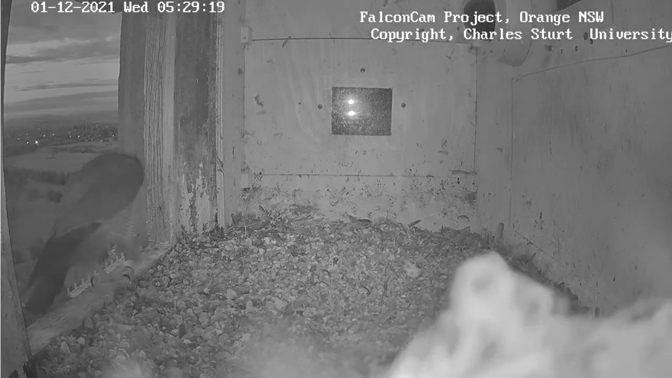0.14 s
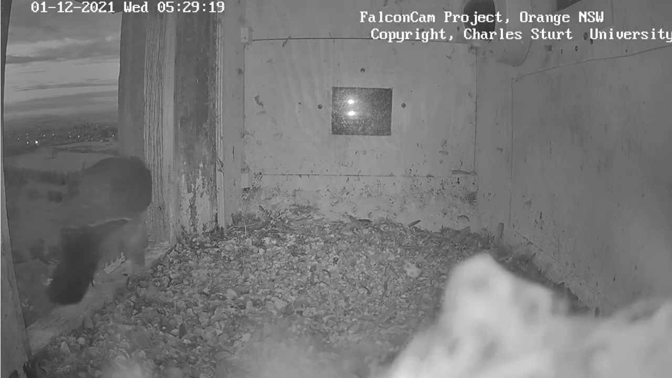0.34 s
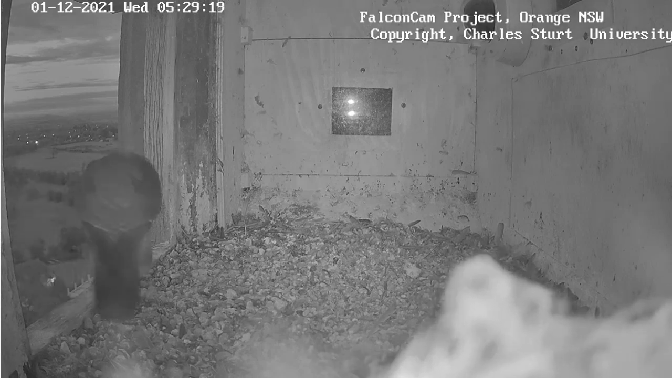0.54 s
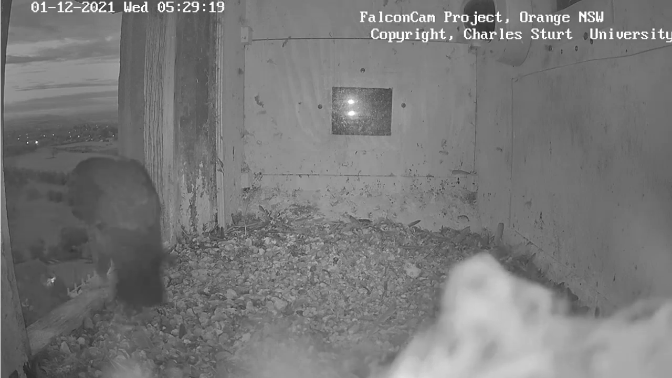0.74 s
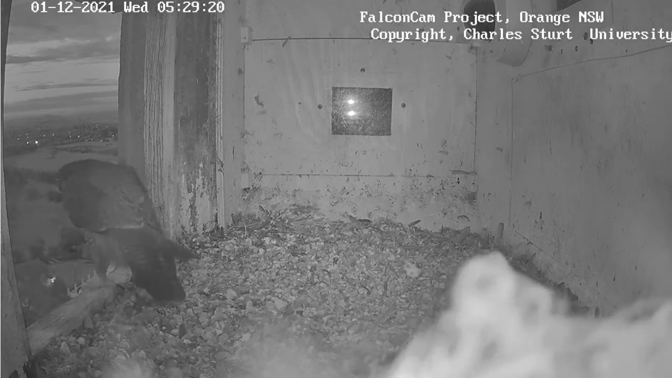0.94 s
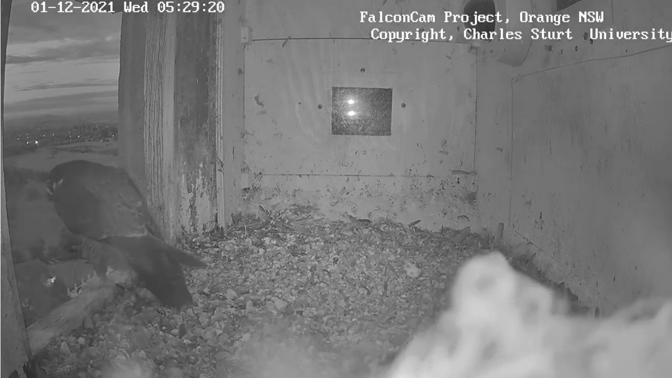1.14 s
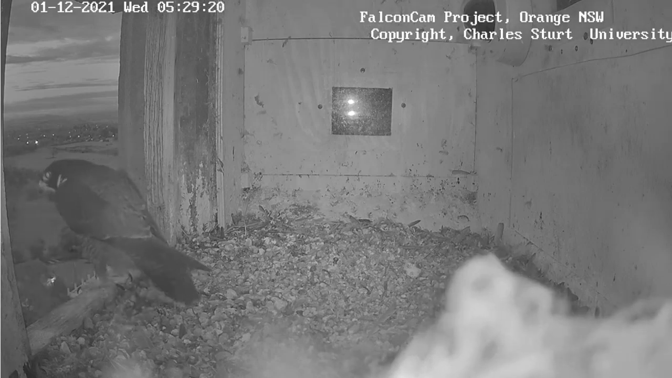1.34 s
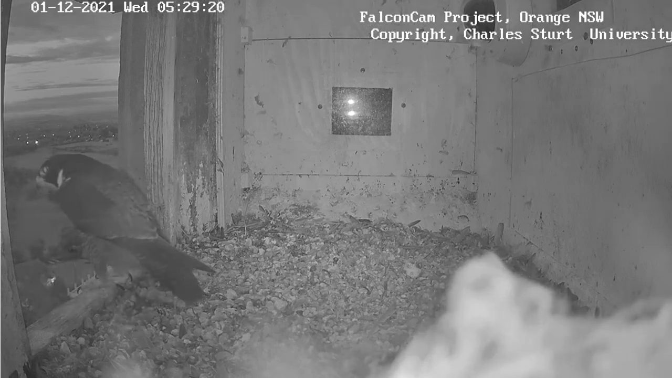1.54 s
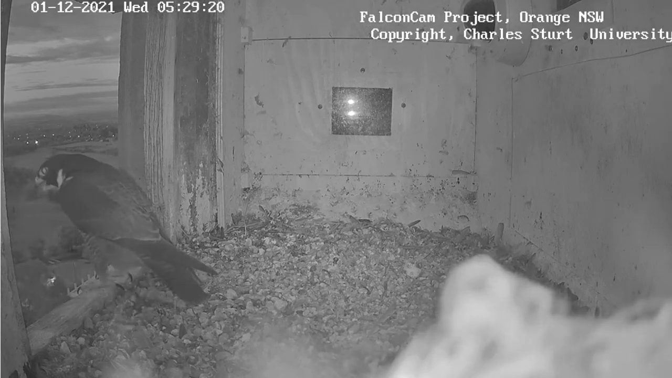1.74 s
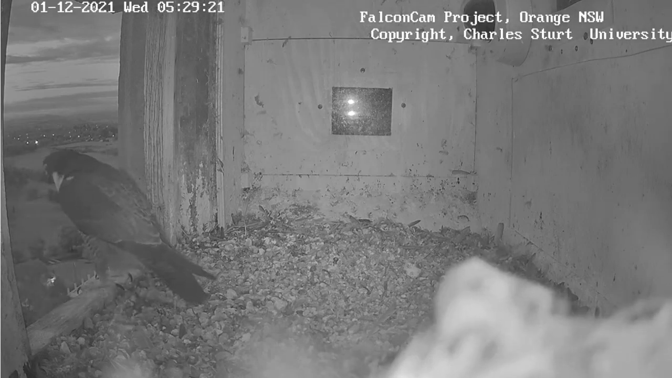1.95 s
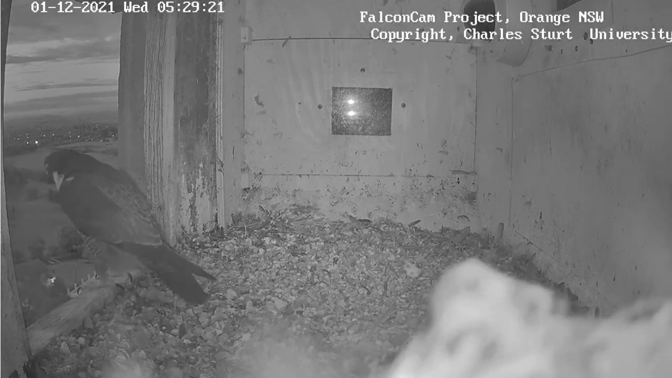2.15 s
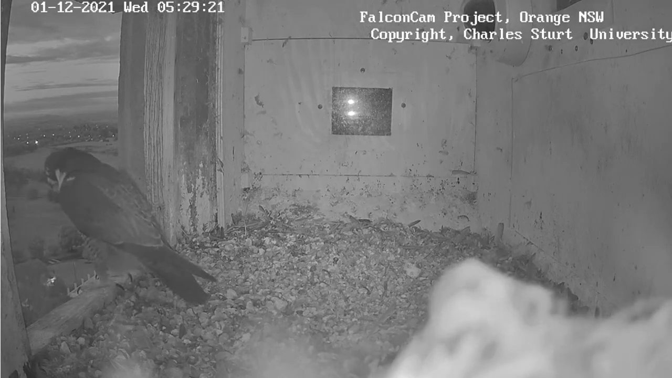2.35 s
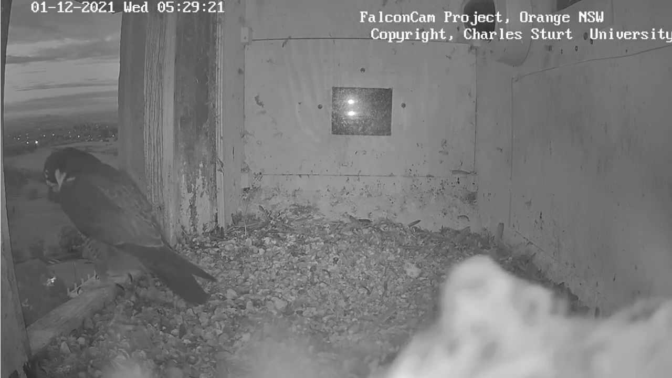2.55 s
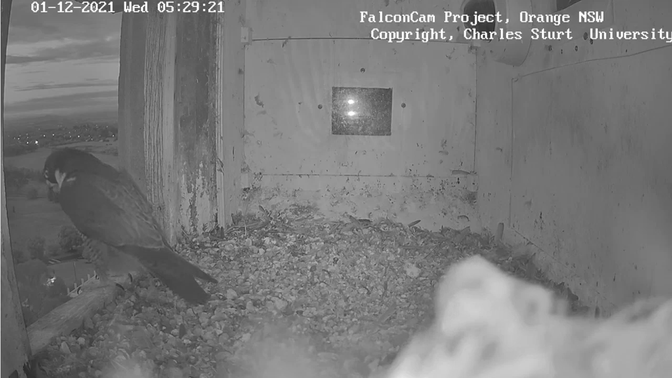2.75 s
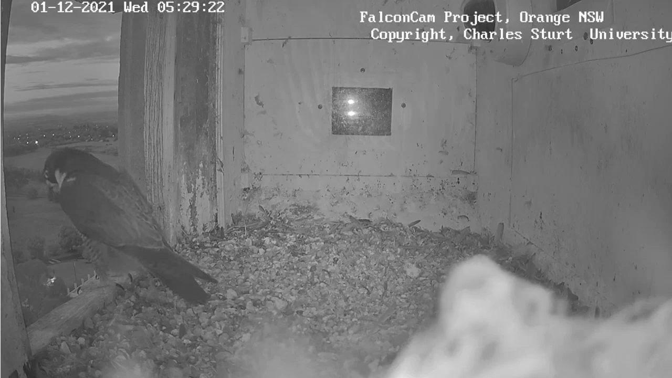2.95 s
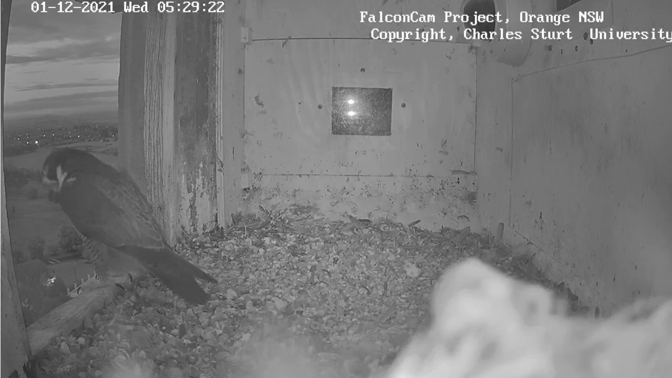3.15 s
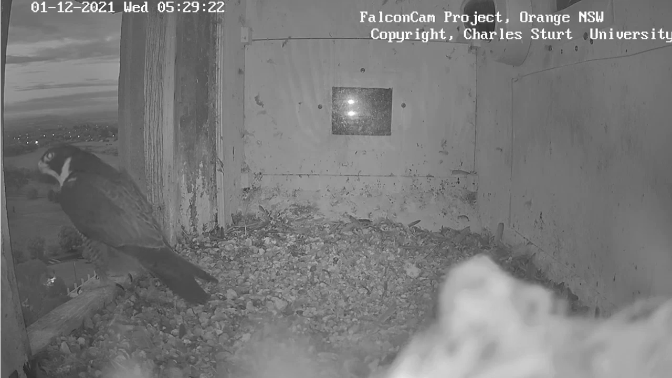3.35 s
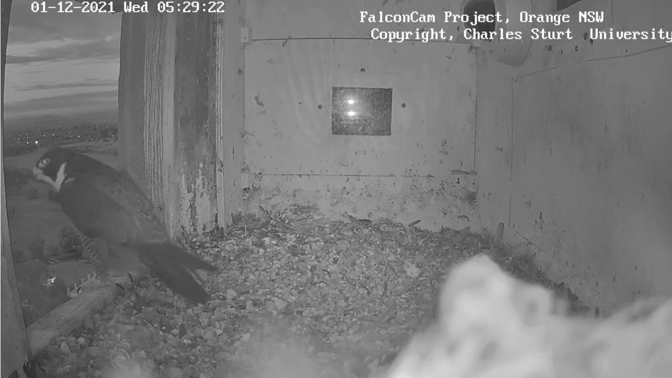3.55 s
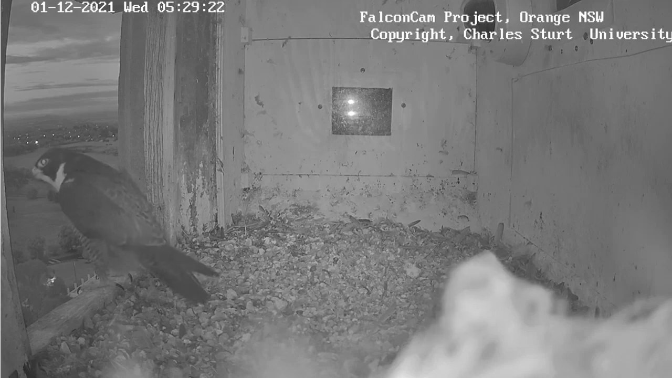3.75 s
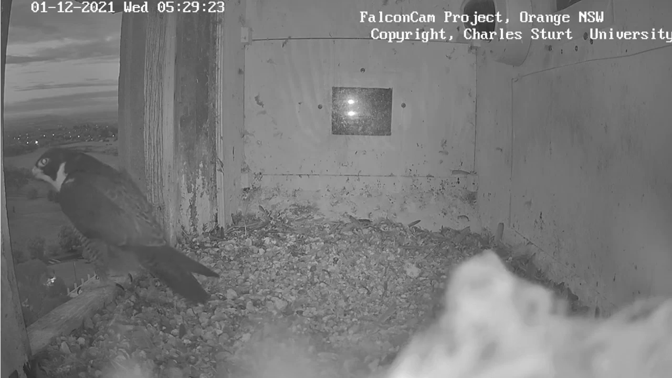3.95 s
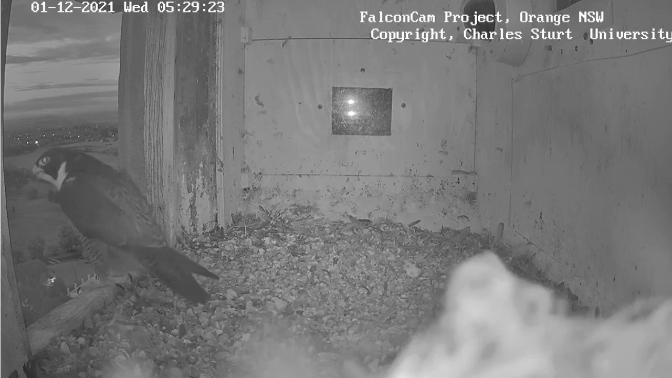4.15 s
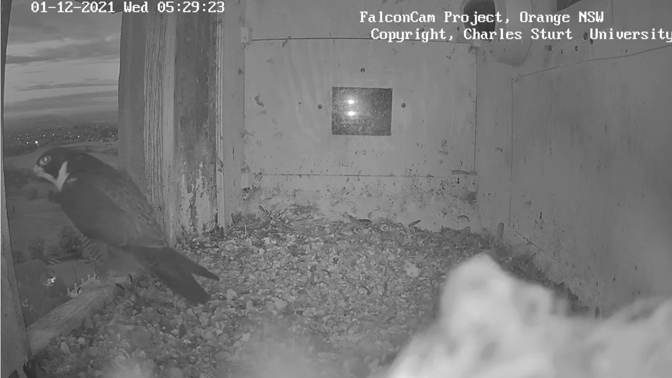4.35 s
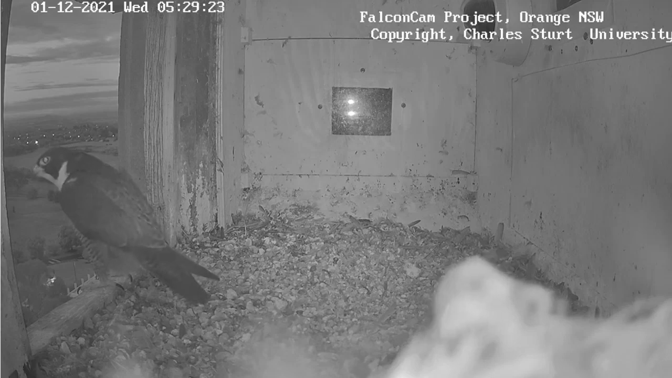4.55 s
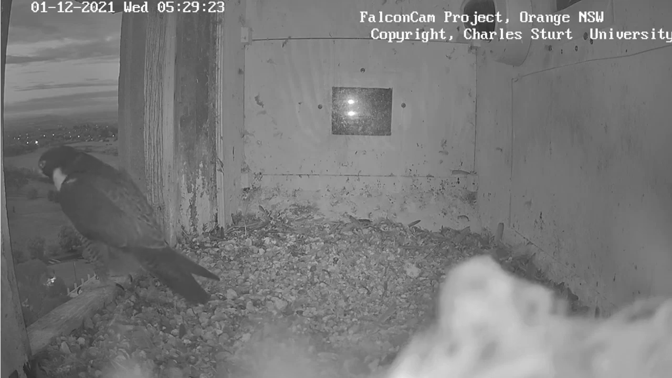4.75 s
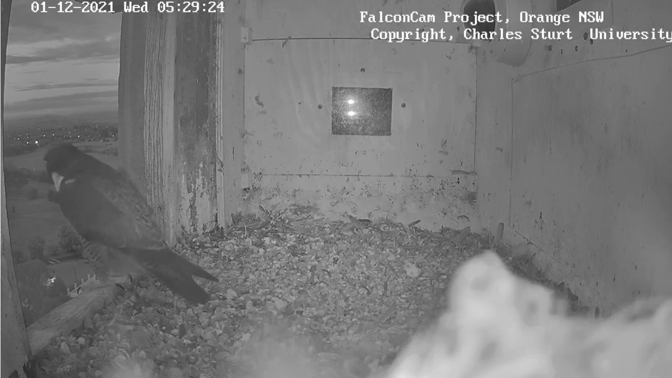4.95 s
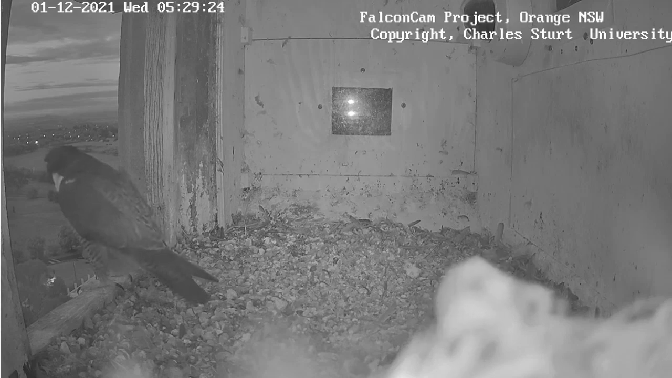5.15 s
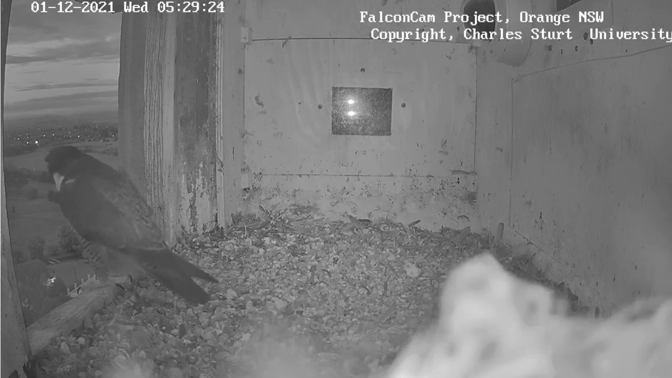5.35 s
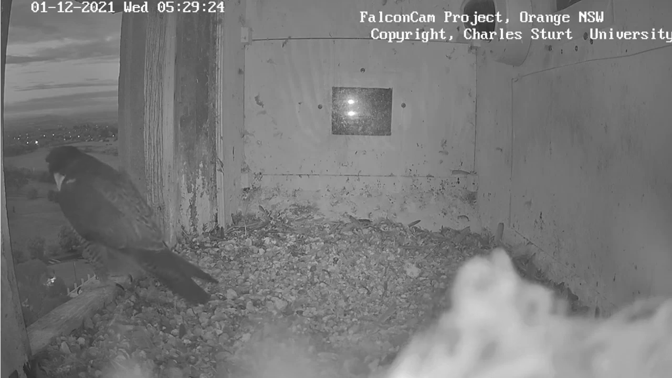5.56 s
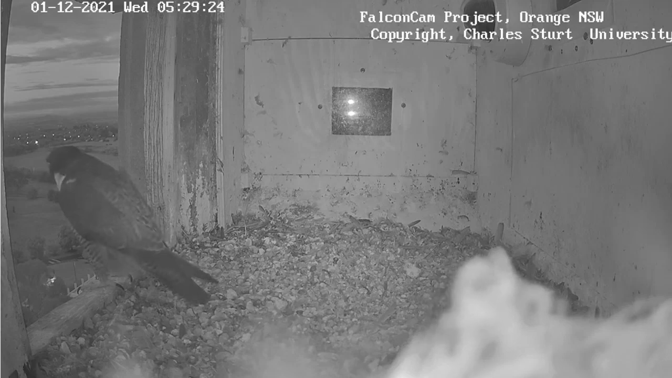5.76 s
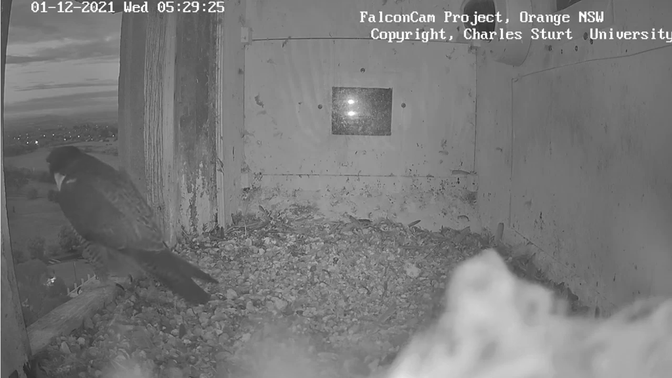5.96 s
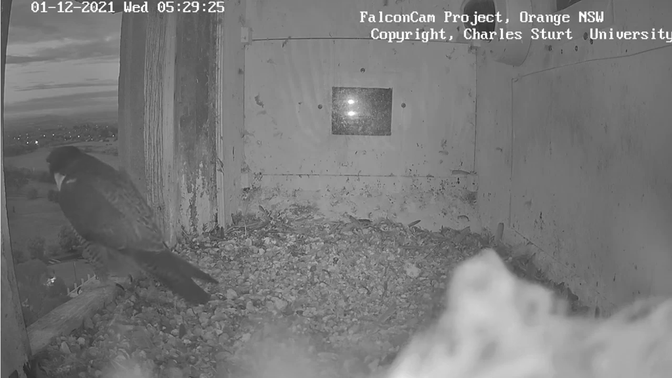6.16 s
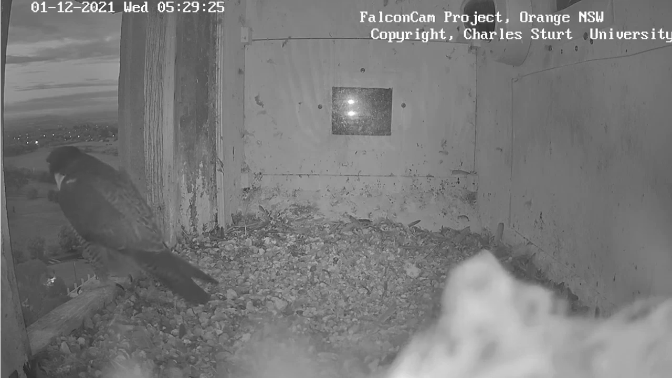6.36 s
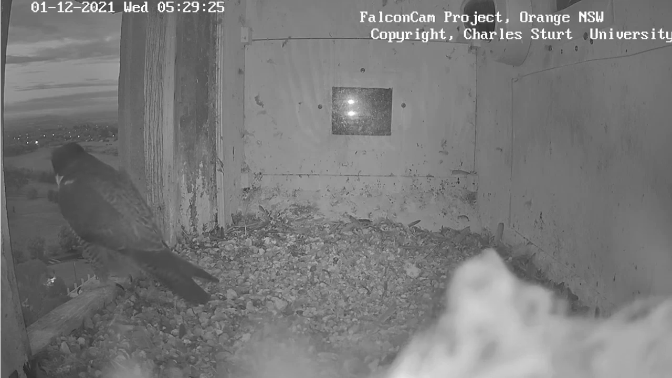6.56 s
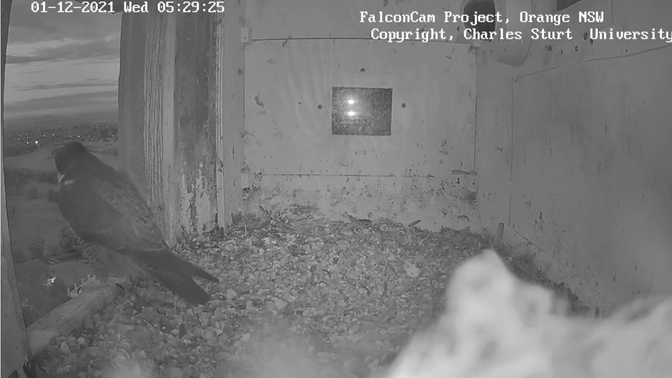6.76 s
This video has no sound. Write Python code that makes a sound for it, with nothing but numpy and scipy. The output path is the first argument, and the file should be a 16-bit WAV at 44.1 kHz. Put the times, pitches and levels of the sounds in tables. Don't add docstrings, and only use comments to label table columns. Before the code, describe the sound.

The scene opens on the ringing tail of a loud, clipped falcon chup, close to a cheap camera microphone in a wooden nest box. At 0.3 s a thin whistle climbs steeply and breaks into a sharp falling chip with a raspy edge. A pulsed chup, low cluck into falling squeal, follows at 0.8 s, another ee-chip at 1.25 s, and a chup with a small chip at 1.8 s. Quick wall reflections and a hollow tank ring of over a second surround each. Faint distant peeps appear around 2.8-3.4 s, then a last chup at 3.5 s. A softer ee-chip comes at 4.15 s and a faint, broken one at 4.85 s. Low board rumble settles throughout over steady mains hum and airy hiss. From about 5 s a very faint treble dawn chorus rises, with tiny far peeps from 5.4 to 6.8 s. Tiny sample dropouts occur occasionally.

```python
import sys
import numpy as np
from scipy import signal
from scipy.fft import rfft, irfft
from scipy.io import wavfile
from scipy.ndimage import uniform_filter1d

SR = 44100
rng = np.random.default_rng(int(sys.argv[2]) if len(sys.argv) > 2 else 0)


def wav_record(signal):
    frames = np.transpose(np.atleast_2d(signal))
    bounded = np.clip(frames, -1, 1)
    quanta = np.round(bounded * 32767).astype(np.int16)
    wavfile.write(sys.argv[1], SR, quanta)


def nominal_scale(level):
    x = np.asarray(level, float) / 20
    return 10 ** x


N = 300321
LEAD = SR // 5


def on_log(table, hz, column=1):
    table = np.array(table, float)
    return np.interp(np.log(np.maximum(hz, 1)), np.log(table[:, 0]), table[:, column])


def colour(x, table):
    gain = nominal_scale(on_log(table, np.fft.rfftfreq(len(x), 1 / SR)))
    return irfft(rfft(x) * gain, len(x))


def unit(x):
    return x / np.sqrt(np.mean(x ** 2))


def wander(count, rate):
    size = max(int(SR / rate), 1)
    return unit(uniform_filter1d(uniform_filter1d(rng.standard_normal(count), size), size))


def patchy(x, bands_wide, frames_long, depth_db):
    frames = signal.stft(x, SR, nperseg=512)[2]
    flicker = uniform_filter1d(rng.standard_normal(frames.shape), bands_wide, axis=0)
    flicker = uniform_filter1d(flicker, frames_long, axis=1)
    return signal.istft(frames * nominal_scale(depth_db * unit(flicker)), SR, nperseg=512)[1][:N]


def add(out, s, x, fade_s=.002):
    steps = np.arange(x.shape[-1])
    first = int(s * SR) + LEAD
    fade = np.clip(np.minimum(steps, steps[::-1]) / (fade_s * SR), 0, 1)
    out[..., first:first + len(steps)] += x * fade


def ring_of(table):
    cepstrum = irfft(np.log(nominal_scale(on_log(table, np.fft.rfftfreq(1024, 1 / SR)))))
    cepstrum[1:512] *= 2
    cepstrum[513:] = 0
    return irfft(np.exp(rfft(cepstrum)))[:512]


def glides(table, fade_s):
    out = np.zeros(N + LEAD)
    for s, start_hz, end_hz, length, db in table:
        hz = np.linspace(start_hz, end_hz, int(length * SR))
        tone = np.sqrt(2) * np.sin(2 * np.pi * np.cumsum(hz) / SR)
        add(out, s, nominal_scale(db) * tone, fade_s)
    return out * (1 + 0.56 * wander(N + LEAD, 200))


def mains_hum():
    hum_db = [-42.5, -70, -54.5, -62.5, -49.5, -55, -62, -61]
    t = np.arange(N) / SR
    hum = np.zeros(N)
    for k, db in enumerate(hum_db):
        level = nominal_scale(db + (-1.36 + 0.14 * k) * wander(N, 5.1))
        hum += level * np.sqrt(2) * np.sin(2 * np.pi * 50 * (k + 1) * t + k)
    return hum


def open_air():
    # pitch_hz [Hz], level_db [dB per Hz]
    air_colour = [(38, -23), (65, -0.5), (100, -12.5), (142, -8), (200, -8), (251, -7.5), (346, -24),
                  (600, -12.5), (948, -34.5), (1760, -26.5), (3750, -35.5), (5660, -37), (9150, -47),
                  (15500, -44.5)]
    hz = np.fft.rfftfreq(512, 1 / SR)
    depth_db = 1.0 + 1.5 * ((hz > 4000) & (hz < 8500))[:, None]
    air = patchy(colour(rng.standard_normal(N), air_colour), 6, 8, depth_db)
    return nominal_scale(-49) * unit(air)


def rumble():
    # pitch_hz [Hz], level_db [dB]
    board_colour = [(50, -26.5), (80, 8), (150, 0.5), (300, 11), (450, 16), (700, -38.5)]
    start_db, settled_db, settle_s = -29, -52, 2.7
    settling = np.exp(-np.arange(N) / SR / settle_s)
    db = settled_db + (start_db - settled_db) * settling - 4 + 1.1 * wander(N, 12)
    return nominal_scale(db) * unit(colour(rng.standard_normal(N), board_colour))


def chorus():
    # pitch_hz [Hz], level_db [dB]
    haze_colour = [(3000, -20), (4300, -15), (5600, 1.5), (7000, 1.5), (8300, -13), (10000, -34)]
    early_db, late_db, rises_s, rise_length_s = -74, -65, 4.9, .6
    haze = patchy(colour(rng.standard_normal(N), haze_colour), 4, 6, 3.0)
    light = 1 / (1 + np.exp((rises_s - np.arange(N) / SR) / rise_length_s))
    return nominal_scale(early_db + (late_db - early_db) * light) * unit(haze)


def syrinx(note, shaky):
    s, *columns = np.transpose(note)
    t = np.arange(s[0], s[-1], 1 / SR)
    hz, *levels, rough = (np.interp(t, s, c) for c in columns)
    here = ((t * SR).astype(int) + LEAD) % shaky.shape[1]
    rough = np.clip(rough, 0, 1)
    phase = 2 * np.pi * np.cumsum(hz * (1 + 0.085 * rough * shaky[0, here])) / SR
    swing = np.sqrt(2) * (1 + rough * shaky[1, here]) / np.sqrt(1 + rough ** 2)
    return hz, levels, phase, swing


def swell(share, db, peak, rise_db, fall_db):
    rise = rise_db * np.abs(1 - share / peak) ** 3
    fall = fall_db * ((share - peak) / (1 - peak)) ** 2
    return db - np.where(share < peak, rise, fall)


def glide(call, swells, bend, rough):
    s, length, start_hz, end_hz, db = call
    share = np.linspace(0, 1, num=30)
    pitch = start_hz + (end_hz - start_hz) * share ** bend
    levels = [db + swell(share, *row) for row in swells]
    return np.transpose([s + length * share, pitch, *levels, 0 * share + rough])


def pulsed(note, throat, shaky, tank_db=0, puffs_db=0):
    hz, (low_db, top_db), phase, swing = syrinx(note, shaky)
    k = np.arange(2, 30)[:, None]
    puffs = np.sum(np.cos(k * phase - .06 * k ** 2) * (k * hz < .35 * SR), axis=0)
    rough = np.mean(note, axis=0)[-1]
    puffs = unit(puffs * swing * (1 + .7 * rough * np.cos(phase / 2)))
    hiss = nominal_scale(-5) * 3 * rough * rng.standard_normal(len(hz))
    rung = unit(signal.lfilter(ring_of(throat), 1, puffs + hiss))
    to_tank = np.array([[0], [1]])
    turn_db = to_tank * (tank_db + 9 * np.linspace(-.5, .5, len(hz)))
    low = np.sqrt(2) * nominal_scale(low_db + turn_db) * np.cos(phase)
    return low + nominal_scale(top_db + to_tank * puffs_db) * rung


def chups(out, shaky):
    # start_s [s], length_s [s], start_hz [Hz], end_hz [Hz], level_db [dB]
    clucks = [
        (-.13, .035, 425.4, 650, -11.5),
        (.794, .025, 476.2, 644.6, -12.5),
        (1.793, .035, 408.5, 687.5, -13.5),
        (3.486, .035, 428.4, 686, -12),
    ]
    # start_s [s], length_s [s], start_hz [Hz], end_hz [Hz], level_db [dB]
    squeals = [
        (-.095, .075, 1124, 1049, -16.5),
        (0.814, 0.043, 1192, 1037, -18),
        (1.824, .035, 1157, 956, -21),
        (3.517, 0.035, 1146, 926, -21.5),
    ]
    # pitch_hz [Hz], level_db [dB]
    cluck_throat = [(600, -12.5), (900, -15.5), (1150, -5.5), (1600, -2), (2200, 2.5), (2800, -16),
                    (3450, -6.5), (4100, -21), (4800, -17.5), (6000, -21), (6900, -24.5), (8200, -40),
                    (12000, -66.5)]
    squeal_throat = [(1060, -47), (1800, -1.5), (2200, -19.5), (3270, -10), (3980, -19), (4900, -6.5),
                     (5590, -5), (6170, -12), (6710, -11.5), (7780, -35), (13000, -46.5)]
    # level_db [dB], peak [share of note], rise_db [dB], fall_db [dB]
    cluck_swells = [(-1.33, 0.56, 27, 13), (-0.5, 0.37, 26.5, 9)]
    squeal_swells = [(-10.5, 0.087, 9, 19), (-0.93, 0.49, 12, 5)]
    low_to_tank_db = [-4.5, -0.9, -2, -1]
    puffs_to_tank_db = [0.1, 0.1, 1.5, -2.5]
    for cluck, squeal, *to_tank in zip(clucks, squeals, low_to_tank_db, puffs_to_tank_db):
        opening = glide(cluck, cluck_swells, bend=.85, rough=.35)
        add(out, cluck[0], pulsed(opening, cluck_throat, shaky, *to_tank))
        ending = glide(squeal, squeal_swells, bend=.75, rough=.22)
        add(out, squeal[0], pulsed(ending, squeal_throat, shaky))


def nest_box():
    t = np.arange(2 * SR) / SR
    box = rng.standard_normal(len(t)) * nominal_scale(-60 * t / .03) * (t > .002)
    return (t == 0) + nominal_scale(-11) * box / np.sqrt(np.sum(box ** 2))


def hollow_tank():
    # pitch_hz [Hz], t60_s [s], level_db [dB], build_up_s [s]
    ringing = [(150, 4, -2, 0.062), (400, 2.7, 2, 0.077), (650, 3.74, -7.5, 0.012), (920, 2.2, 1, .06),
               (1320, 2.15, -5, 0.0061), (2370, 1.78, -2, 0.029), (2800, 1.66, -3.5, 0.014),
               (4020, 1.38, -0.5, 0.0074), (5500, 1.015, -6, .025), (7900, 0.776, -8.5, 0.01),
               (11900, 0.27, -11, 0.018)]
    # pitch_hz [Hz], level_db [dB]
    mouth = [(380, 0), (480, -1), (630, 3), (700, 1), (770, -9), (940, -8), (1100, 0)]
    t = np.arange(2 * SR) / SR
    hz, s, frames = signal.stft(rng.standard_normal(len(t)), SR, nperseg=512)
    t60, db, build = (on_log(ringing, hz, column=c)[:, None] for c in (1, 2, 3))
    t60 = np.maximum(t60, .05)
    fall = nominal_scale(db - 60 * s / t60) / np.sqrt(t60 * SR / np.log(1e6))
    fall = fall * (1 - np.exp(-(s / build) ** 3))
    tail = signal.istft(frames * fall, SR, nperseg=512)[1][:len(t)] * (t > .004)
    rounds, late = np.divmod(np.arange(len(t)), int(.072 * SR))
    echoes = (late == 0) * (rounds > 0) * .4 ** (rounds - 1.)
    wall = signal.lfilter(*signal.butter(2, 900, fs=SR), echoes)
    return signal.lfilter(ring_of(mouth), 1, nominal_scale(-14) * wall + tail)


def whistle(note, shaky, tank_db):
    # pitch_hz [Hz], level_db [dB]
    breath_colour = [(1000, -28.5), (3000, -5), (6000, 4), (10000, -12), (15000, -30)]
    hz, levels, phase, swing = syrinx(note, shaky)
    lead_db = 0.42 * (levels[1] - levels[0])
    levels += [levels[2] - 19 + lead_db, levels[3] - 26.5 + lead_db]
    air = unit(colour(rng.standard_normal(4096), breath_colour))[np.arange(len(hz)) % 4096]
    air = nominal_scale(-18.5 + np.max(levels[1:], axis=0)) * air
    partials = []
    for k, db in enumerate(levels):
        waver_db = 1.1 * (k + 1) * signal.detrend(wander(4 * len(hz), 130)[:len(hz)])
        partials.append(swing * nominal_scale(db + waver_db) * np.sin((k + 1) * phase))
    partials = np.array(partials)
    shares = nominal_scale(np.array(tank_db)[np.minimum(np.arange(len(levels)), 2)])
    return air + np.array([partials.sum(axis=0), shares @ partials])


def ee(call, voice):
    s, length, hz, climb, db = call
    first_db, third_db, fourth_db, attack_s = voice
    t = np.linspace(0, length, num=60)
    end = np.exp((t - length) / .008)
    pitch = (hz + climb * t) * (1 - 0.074 * np.exp(-t / .009) - 0.016 * end)
    level = db - 22 * np.clip(1 - t / attack_s, 0, 1) - 5 * end
    top = level - 200 * (t - length / 2)
    levels = [level + first_db, level, top + third_db, top + fourth_db]
    return np.transpose([s + t, pitch, *levels, 0 * t + .15])


def stray_tones():
    # start_s [s], start_hz [Hz], end_hz [Hz], length_s [s], level_db [dB]
    tones = [(.3, 2250, 2700, .045, -38), (.384, 4250, 4350, .016, -22), (1.278, 2400, 2650, .045, -35),
             (1.328, 3700, 3600, .014, -32), (.408, 3700, 3600, .012, -28), (4.125, 5650, 5900, .055, -54),
             (.86, 2600, 2550, .014, -27), (1.331, 7300, 6650, .017, -24), (4.184, 6900, 6250, .016, -31),
             (4.186, 3300, 3100, .022, -36)]
    return np.tile(glides(tones, .004), (2, 1))


def chip(curve, voice):
    s, hz, db = np.transpose(curve)
    bridged = np.minimum(np.maximum.accumulate(db), np.maximum.accumulate(db[::-1])[::-1])
    top = db.max() + 0.67 * (bridged - db.max())
    second = top + voice[0] - 494 * (s - s[0])
    return np.transpose([s, hz, db, second, top + voice[1], top + voice[2], 0 * s + .15])


def ee_chips(out, shaky):
    # start_s [s], length_s [s], pitch_hz [Hz], climb [Hz per s], level_db of the leading 2nd partial [dB]
    ees = [
        (.284, .098, 2181, 4310, -23.5),
        (1.253, .076, 2224, 1080, -22),
        (4.136, 0.048, 2015, 100, -25.5),
        (4.85, 0.043, 2137, 500, -38),
    ]
    # 1st_db, 3rd_db, 4th_db [dB against the 2nd partial], attack_s [s]
    ee_voices = [(-24.5, -22, -21, 0.0099), (-23, -22.5, -22, 0.0047), (-25, -35, -11.5, 0.022),
                 (-7, 0.5, -5, 0.008)]
    # time_s [s], pitch_hz [Hz], effort_db [dB]
    chip_curves = [
        [(0, 2800, -17), (.016, 2600, -31)],
        [(.383, 2600, -41), (.389, 2670, -15), (.398, 2560, -11), (.404, 2450, -19), (.412, 2350, -13),
         (.424, 2370, -19), (.433, 2350, -30)],
        [(1.327, 2500, -33), (1.332, 2470, -16), (1.337, 2380, -12), (1.343, 2240, -17), (1.365, 2190, -30)],
        [(1.862, 2520, -43), (1.868, 2520, -21), (1.875, 2450, -20), (1.884, 2430, -33)],
        [(4.183, 2350, -32), (4.188, 2230, -21), (4.2, 2110, -18), (4.212, 2080, -40)],
        [(4.889, 2410, -37), (4.895, 2390, -24), (4.907, 2340, -25), (4.913, 2200, -39), (4.917, 2080, -16.5),
         (4.928, 2010, -18), (4.937, 2040, -35)],
    ]
    # 2nd_db at the start, 3rd_db, 4th_db [dB against the loudest effort]
    chip_voices = [(-16, -40, -50), (5, -20, -40.5), (-1, -23.5, -39.5), (-4, -26, -39), (-6, -21, -42),
                   (-9.5, -13.5, -29)]
    # 1st_db, 2nd_db, higher_db [dB]
    to_tank = [(-5, -1, 4.5), (13, -3.5, -5), (22.5, 0.7, 8), (17.5, 9, 5), (-9, 6, 4), (6.5, 4, 3.5),
               (2.5, -2, 11), (-10.5, 4, 6.5), (1.5, -0.5, 14), (-3.5, 5.5, 1)]
    notes = [*map(ee, ees, ee_voices), *map(chip, chip_curves, chip_voices)]
    for note, tank_db in zip(notes, to_tank):
        add(out, note[0][0], whistle(note, shaky, tank_db))


def air_bursts(out, bursts, tint, fade_db):
    air = unit(colour(rng.standard_normal(N), tint))
    for s, db, length in bursts:
        burst = air[int(s * SR):int((s + length) * SR)]
        burst = burst * nominal_scale(fade_db * np.linspace(.5, -.5, len(burst)))
        add(out, s, nominal_scale(db) * burst, fade_s=0.0015)


def breathy_edges(out):
    # start_s [s], level_db [dB], length_s [s]
    edges = [
        (.384, -25, .016),
        (1.326, -29, .016),
        (4.183, -32, .012),
        (4.89, -44, .02),
    ]
    # pitch_hz [Hz], level_db [dB]
    edge_colour = [(800, -27.5), (2500, -15.5), (4300, -4), (6500, -8.5), (9000, -16.5), (15000, -44.5)]
    air_bursts(out, edges, edge_colour, fade_db=5.5)


def rasps(out):
    # start_s [s], level_db [dB], length_s [s]
    breaks = [
        (.413, -21, .03),
        (1.35, -21, .03),
        (4.195, -30, .02),
        (4.926, -35, .018),
    ]
    # pitch_hz [Hz], level_db [dB]
    rasp_colour = [(150, -54.5), (300, 2), (520, -2), (700, -4), (900, -24), (1700, -2), (3000, -11.5),
                   (6000, -18), (12000, -53.5)]
    air_bursts(out, breaks, rasp_colour, fade_db=7.5)


def falcon():
    out = stray_tones()
    shaky = np.array([wander(N + LEAD, 1100), wander(N + LEAD, 700)])
    chups(out, shaky)
    ee_chips(out, shaky)
    breathy_edges(out)
    rasps(out)
    return out


def far_birds():
    # start_s [s], start_hz [Hz], end_hz [Hz], length_s [s], level_db [dB]
    peeps = [(2.82, 1750, 1650, .03, -57), (2.865, 2650, 2350, .035, -55), (2.9, 1750, 1600, .03, -56),
             (2.94, 1520, 1420, .05, -61), (2.945, 4650, 4500, .03, -68), (3.07, 4120, 4100, .08, -70),
             (3.12, 2750, 2300, .035, -62), (3.315, 3700, 2750, .045, -68), (3.39, 4600, 4600, .03, -69),
             (3.435, 3220, 3220, .045, -61), (5.44, 3150, 3400, .05, -63), (5.97, 7000, 7300, .12, -72),
             (6.215, 1850, 1650, .04, -54), (6.23, 6600, 6900, .03, -66), (6.27, 6700, 6900, .025, -67),
             (6.33, 6800, 6900, .025, -70), (6.4, 5700, 5300, .025, -66), (6.4, 1650, 1900, .06, -65),
             (6.61, 5700, 5400, .025, -69), (6.67, 1750, 1500, .035, -60), (6.715, 5600, 5450, .02, -68),
             (6.745, 5400, 5800, .025, -65)]
    return glides(peeps, .01)


def scene():
    direct, sent = falcon()
    peeps = far_birds()
    sent = sent * (1 + .5 * wander(N + LEAD, 300)) / np.sqrt(1.25)
    heard = signal.fftconvolve(direct + peeps, nest_box())
    heard = heard + signal.fftconvolve(sent + nominal_scale(-8) * peeps, hollow_tank())
    heard = heard[LEAD:LEAD + N] + mains_hum() + open_air() + rumble() + chorus()
    return np.array([heard, heard])


def low_pass(x):
    return signal.sosfilt(signal.butter(12, 15700, fs=SR, output="sos"), x)


def record(dry):
    lost_s = [.3291, 1.3501, 2.841, 4.2539, 5.6407]
    # pitch_hz [Hz], level_db [dB]
    spread = [(300, 0), (500, 2.8), (780, 0), (900, 1), (1150, 4.2), (1700, 4.2), (1900, 3), (3400, 2.8),
              (3600, 1.3), (4500, -.5), (8300, 0), (10000, 2.3), (16000, 2)]
    t = np.arange(N) / SR
    lost = sum(np.abs(t - s) < .0022 / 2 for s in lost_s)
    bass = signal.filtfilt(*signal.butter(2, 250, fs=SR), dry[0])
    mono = dry[0] - lost * (dry[0] - bass)
    lean = np.tanh(on_log(spread, np.fft.rfftfreq(N, 1 / SR)) * np.log(10) / 40)
    side = irfft(rfft(mono) * lean, N)
    stereo = np.array([mono + side, mono - side])
    loud = 1.55 * np.tanh(stereo / 1.455).clip(-2 / 3, 2 / 3)
    return low_pass(loud)


dry = scene()
out = record(dry)
wav_record(out)
```